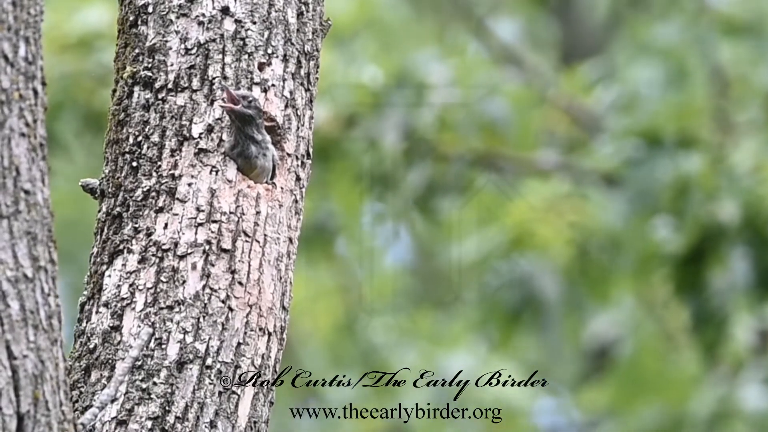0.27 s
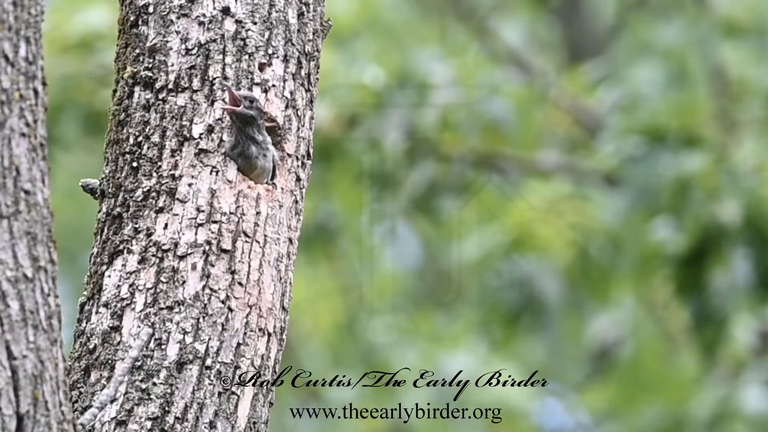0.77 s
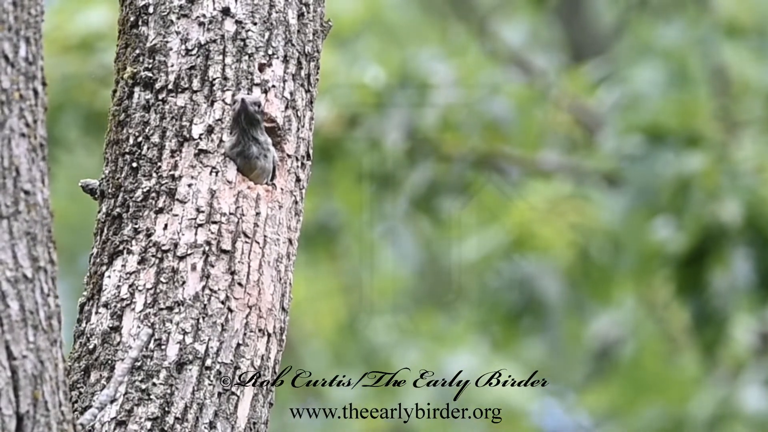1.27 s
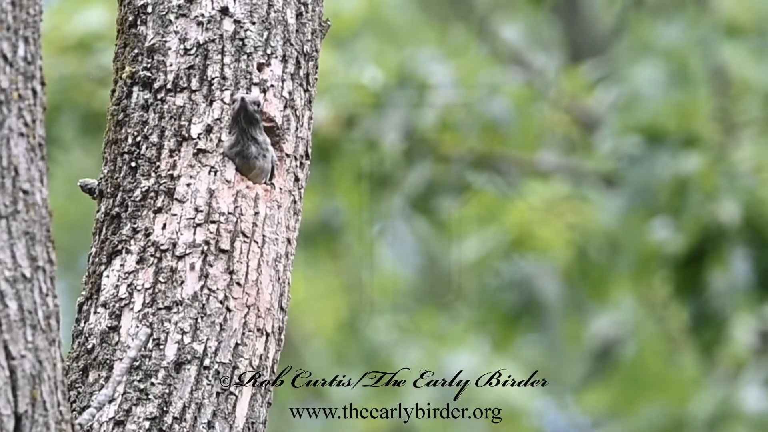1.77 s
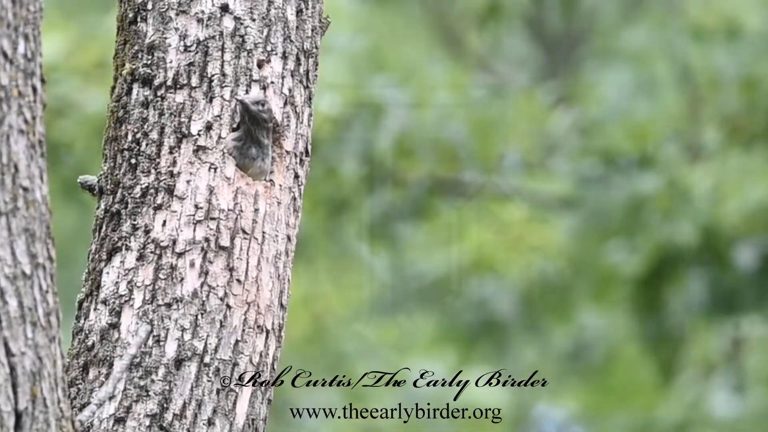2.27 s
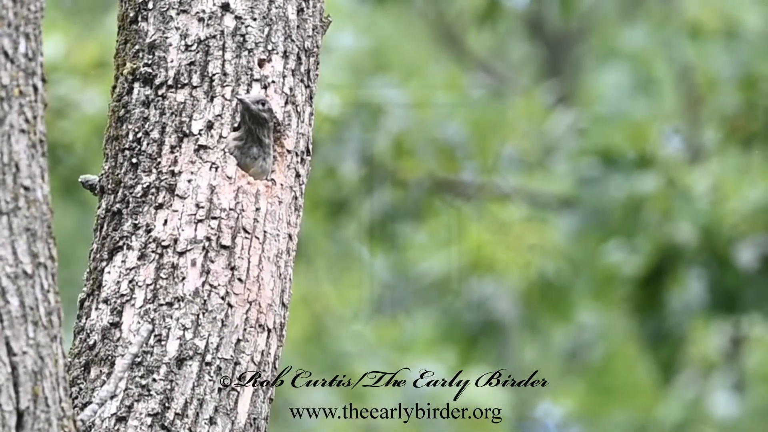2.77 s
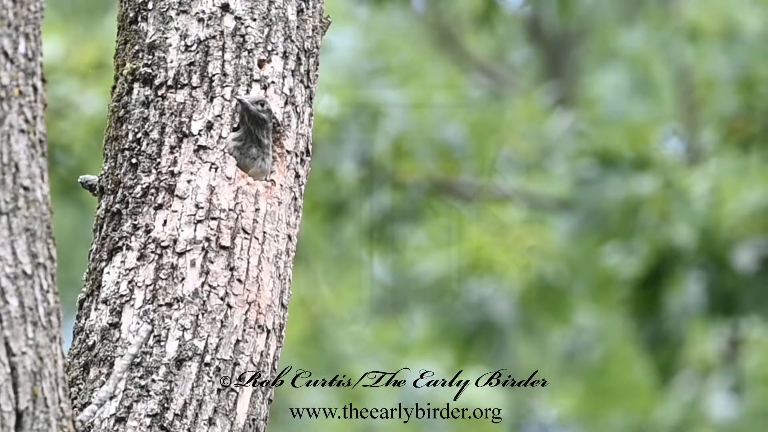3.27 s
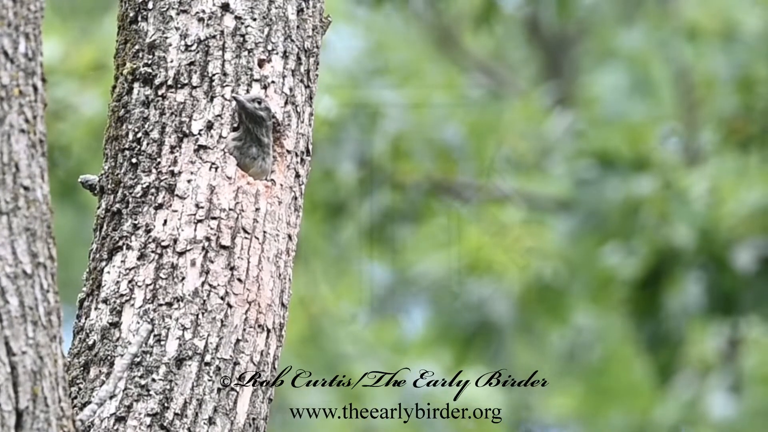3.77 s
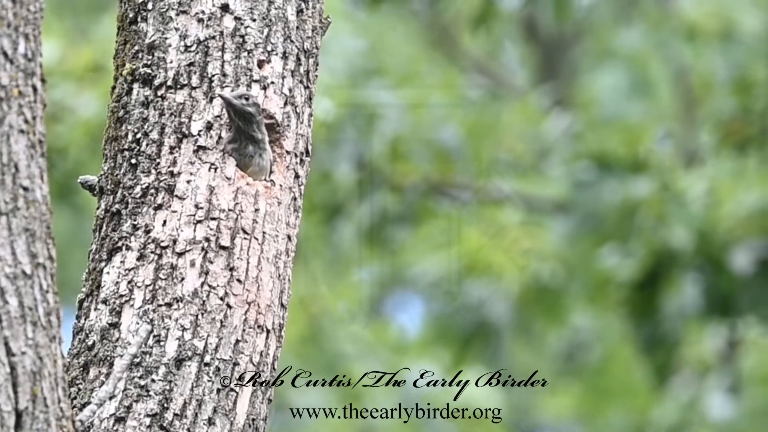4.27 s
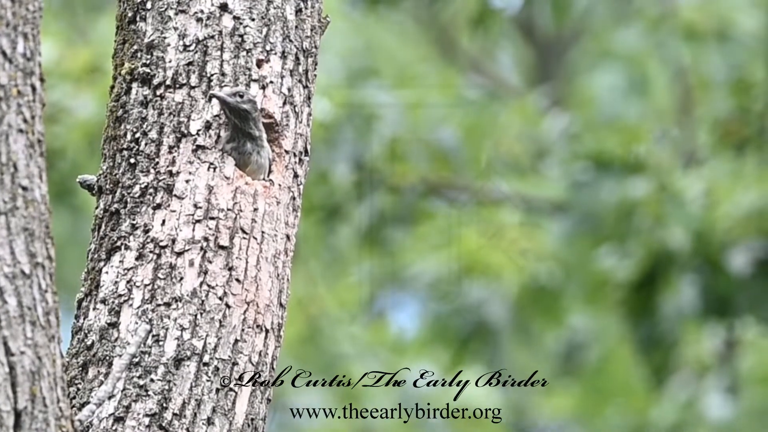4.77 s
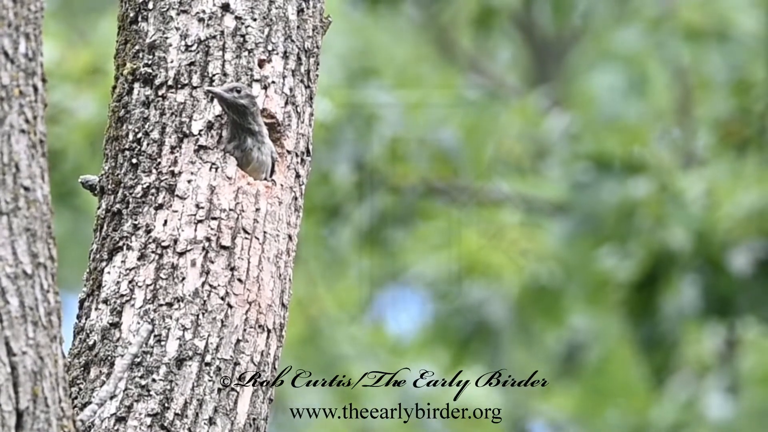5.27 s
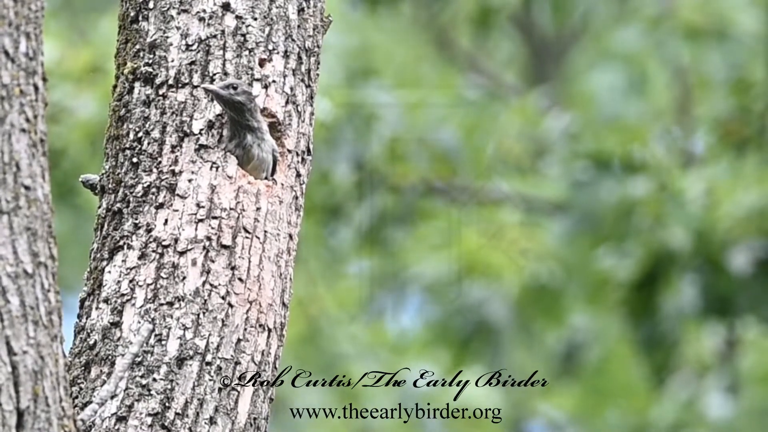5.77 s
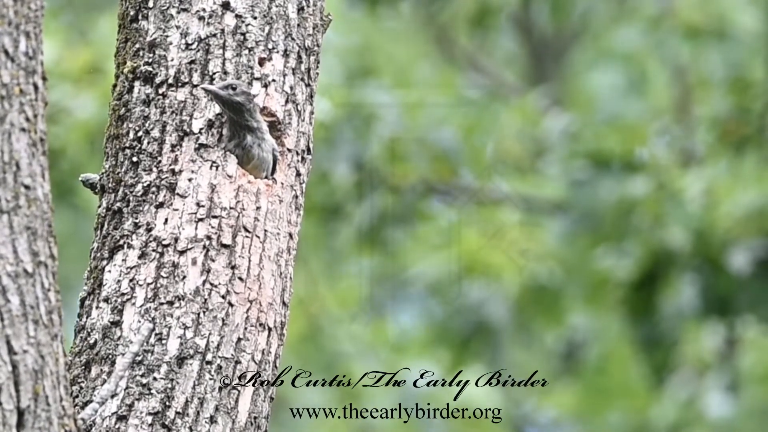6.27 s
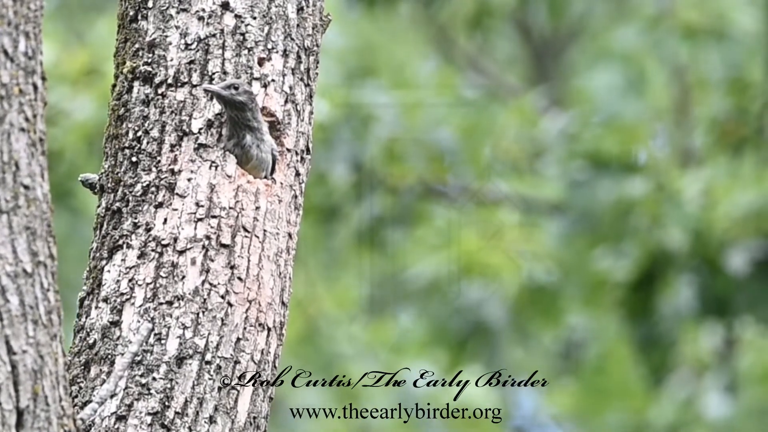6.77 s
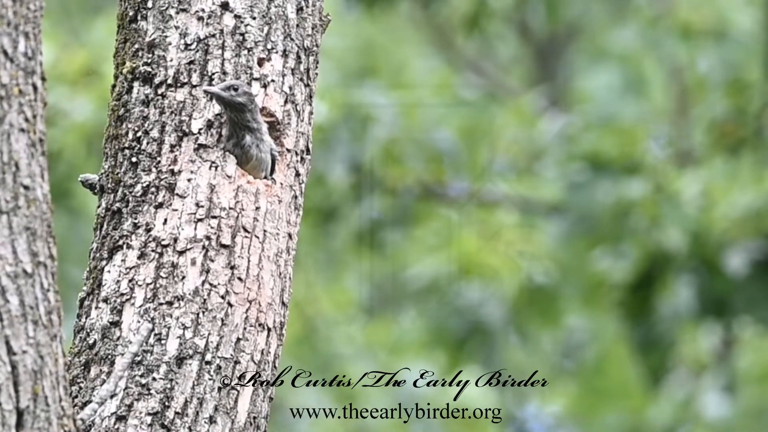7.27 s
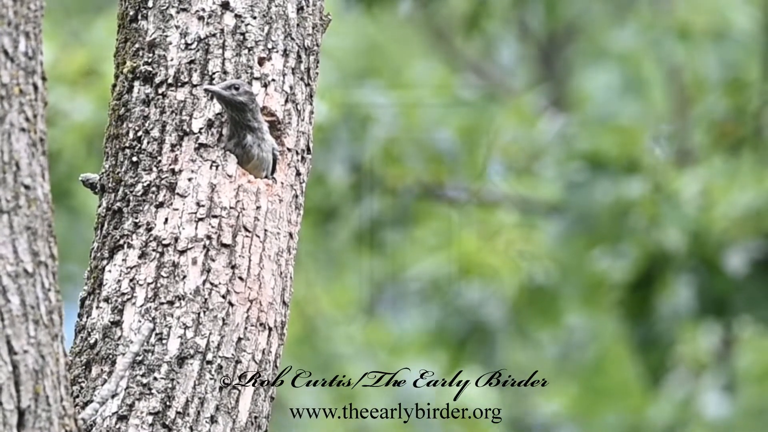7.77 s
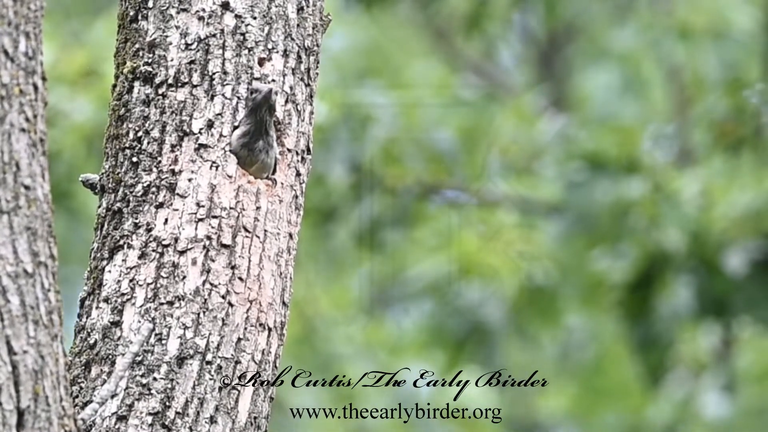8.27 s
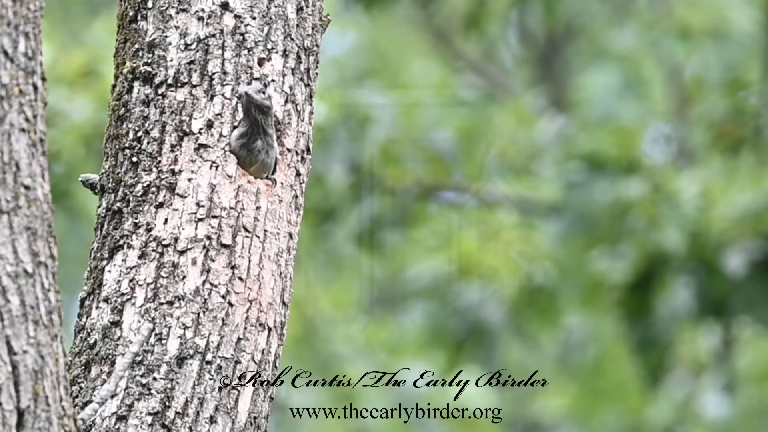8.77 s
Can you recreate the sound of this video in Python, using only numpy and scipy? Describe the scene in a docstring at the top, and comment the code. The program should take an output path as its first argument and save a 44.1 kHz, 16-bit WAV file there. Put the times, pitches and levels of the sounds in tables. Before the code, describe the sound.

One microphone by a woodpecker's nest hole picks up woodland hiss, a distant roar and faint high insects. The nestling gives a few widely spaced rising chips while birds farther off whistle and send short falling chirps through the trees. Late on, the nestling breaks into two fast, raspy rattles, the second louder, followed by one short low whistle from a distant bird.

```python
"""In a wood, one bass-cut microphone by a woodpecker's nest hole. Far-off roar, treble hiss and insects run
throughout; a faint rumble and hum stop at 2.2 s. From 0.5 s distant birds hold whistles, and from 1.1 s
the nestling gives three short rising chips, seconds apart. Falling chirps come through the trees from
2.3 s, one trill at 3.8 s. At 6.8 and 8 s the nestling gives two buzzy rattles; a low whistle comes last.
The two channels differ only in their treble hiss."""
import sys
import numpy as np
from scipy import signal
from scipy.fft import rfft, irfft
from scipy.io import wavfile
from scipy.ndimage import uniform_filter1d

SR = 44100
rng = np.random.default_rng(int(sys.argv[2]) if len(sys.argv) > 2 else 0)


def inscribe(sig):
    """Save sig as 16-bit PCM at rate SR to the path in sys.argv[1].

    A 1-D sig is mono; a 2-D sig holds one channel per row.
    Samples are clipped to [-1, 1] before scaling.
    """
    pcm = np.round(np.clip(np.atleast_2d(sig).T, -1, 1) * 32767)
    wavfile.write(sys.argv[1], SR, pcm.astype(np.int16))


N = 398663
TIME, FREQS = np.arange(N) / SR, np.arange(N // 2 + 1) * SR / N

def undb(db):
    return 10 ** (np.asarray(db) / 20)

def noise(points):
    """Noise of rms 1 coloured by (f/Hz, level/dB) points."""
    hz, db = np.transpose(points)
    colour = undb(np.interp(np.log(FREQS + 1), np.log(hz), db))
    x = irfft(rfft(rng.standard_normal(N)) * colour, N)
    return x / np.std(x)

def walk(rate):
    """Random levels held 1 / rate s and slewed twice; spread near 1."""
    k = int(SR / rate)
    steps = np.repeat(rng.standard_normal(N // k + 1), k)
    return 1.36 * uniform_filter1d(uniform_filter1d(steps, k), k)[:N]

def add(track, s, x):
    i = int(s * SR)
    track[i:i + len(x)] += x

def bump(u, start, end):
    """A half-sine swell between two points of a note."""
    return np.sin(np.pi * np.clip((u - start) / (end - start), 0, 1))

def echo(x, t60_s=0.46):
    """Scatter from trunks and leaves: a decaying noise tail of unit energy."""
    t = np.arange(SR // 2) / SR
    tail = rng.standard_normal(len(t)) * np.exp(-np.log(1000) * t / t60_s) * np.minimum(t / 0.0044, 1)
    return signal.fftconvolve(x, tail / np.sqrt(np.sum(tail ** 2)))[:N]

# Background spectrum of the wood: f/Hz, relative level/dB
WOOD_SPECTRUM = [(120, -90), (200, -63), (567, -23), (848, -7.5), (999, -3.5), (1290, 0.5), (1640, -2),
                 (2110, -6), (2490, -7), (2990, -9), (3730, -5.5), (4160, -11), (5280, -18.5),
                 (12700, -19.5), (15800, -20)]
# Swell of the far-off roar: t/s, level/dB
ROAR_LEVELS = [(0.0, -35.5), (2.97, -37), (4.91, -36.5), (5.29, -37.5), (7.07, -35.5), (7.58, -37.5),
               (7.93, -37), (9.04, -37.5)]

def wood(treble_gain_db=-35):
    """The distant roar swells slowly; the treble hiss above it stays nearly steady."""
    bed = noise(WOOD_SPECTRUM)
    roar = signal.sosfiltfilt(signal.butter(2, 2200, fs=SR, output="sos"), bed)
    roar_db = np.interp(TIME, *np.transpose(ROAR_LEVELS))
    treble = (bed - roar) * undb(treble_gain_db + 0.17 * walk(2.99))
    return roar / np.std(roar) * undb(roar_db) + treble

def rumble_and_hum(hum_hz=284, hum_start_s=1.17, rise_s=.15, stop_s=2.165):
    """A faint rumble grows as a hum sets in; both stop short."""
    gate = np.clip((stop_s - TIME) / 0.009, 0, 1)
    risen = np.clip((TIME - hum_start_s) / rise_s, 0, 1)
    rumble = noise([(100, -44), (160, -36), (330, -8.5), (480, -3.0), (700, 4), (1000, -66)])
    hum = undb(-84.5 + 2.5 * walk(15)) * np.sin(2 * np.pi * hum_hz * TIME)
    return gate * (undb(-72 + 4.5 * risen) * rumble + risen * hum)

def insects(hz=8480, skirt_hz=1400, db=-63):
    """Insects in the wood: a faint, narrow, gently wavering band."""
    band = noise([(hz - skirt_hz, -70), (hz, 0), (hz + skirt_hz, -70)])
    return band * undb(db + .8 * walk(3.2))

# Tone of the electronics: f/Hz, rms level/dB
WHINE_TONES = [(15622, -67)]

def whine():
    """The electronics give a thin high tone of wandering phase."""
    return sum(np.sqrt(2) * undb(db) * np.sin(2 * np.pi * hz * TIME + .8 * walk(8))
               for hz, db in WHINE_TONES)

# Spectrum of the hiss between the channels: f/Hz, relative level/dB
SIDE_SPECTRUM = [(2000, -31), (4400, -55), (8000, -7), (11000, 6.5), (15500, 5.5)]

def side_hiss(db=-57.5):
    """Steady treble hiss, the only stereo width."""
    return undb(db) * noise([(1000, -90)] + SIDE_SPECTRUM)

def whistle(notes, warble_hz, echo_db, slide_share=1, bend=1, swell=0.7):
    """Wavering near-sine slides; bend under 1 slides early, swell under 1 is loudest early."""
    dry, send, flutter, waver = np.zeros(N), np.zeros(N), walk(200), walk(900)
    edge_s, ordinary_db = 0.0013, -32
    for s, length, from_hz, to_hz, db in notes:
        u = np.arange(int(length * SR)) / (length * SR)
        slide = np.minimum(u / slide_share, 1) ** bend
        hz = from_hz + (to_hz - from_hz) * slide + warble_hz * waver[int(s * SR):][:len(u)]
        edges = np.sin(np.pi / 2 * np.clip(np.minimum(u, 1 - u) * length / edge_s, 0, 1)) ** 2
        envelope = undb(db) * edges * np.sin(np.pi * u ** swell) ** .55
        note = envelope * np.sin(2 * np.pi * np.cumsum(hz) / SR)
        leaves_db = 10.5 * np.clip(np.log2(hz / 3970), -.7, 0)  # leaves scatter low pitches more weakly
        distance_db = 0.54 * (ordinary_db - db)  # a fainter bird is further off and has more echo
        add(dry, s, note)
        add(send, s, undb(echo_db + leaves_db + distance_db) * note)
    return dry * undb(1.3 * flutter) + echo(send)

# Held whistles, off in the wood: t/s, length/s, f/Hz, level/dB
HELD_NOTES = [(.500, 0.037, 7475, -50), (1.118, .060, 7350, -51.5), (1.124, .160, 3285, -41.5),
              (4.655, .030, 3200, -45), (4.682, 0.12, 1710, -38), (4.857, .079, 3070, -39),
              (8.604, .031, 1290, -30.5)]

def held_whistles():
    """Distant birds hold one almost steady pitch per note."""
    notes = [(s, length, hz, hz, db) for s, length, hz, db in HELD_NOTES]
    return whistle(notes, warble_hz=14, echo_db=-5)

# Rising chips at the nest hole: t/s, length/s, from f/Hz, to f/Hz, level/dB
CHIP_NOTES = [(1.108, .02, 2400, 2700, -35), (3.466, 0.021, 1950, 2750, -26),
              (6.299, 0.015, 2190, 2740, -26)]

def nestling_chips():
    """The nestling slides quickly up and holds the top, with little echo."""
    return whistle(CHIP_NOTES, warble_hz=170, echo_db=-8, slide_share=.45, bend=.9, swell=.8)

# Falling chirps among the trees: t/s, length/s, from f/Hz, to f/Hz, level/dB
CHIRP_NOTES = [(2.313, 0.04, 4250, 2550, -32), (3.027, 0.035, 4270, 2450, -30.5),
               (3.661, .041, 4100, 2360, -27.5), (3.912, 0.033, 3350, 2800, -37),
               (4.279, .033, 4080, 2370, -29.5), (4.954, .026, 3600, 2900, -36),
               (4.978, 0.032, 4100, 2730, -33), (5.569, .028, 2980, 2780, -43),
               (5.607, 0.021, 4150, 3600, -38), (5.775, .046, 4200, 2890, -38.5),
               (6.002, 0.053, 4210, 3090, -32.5), (6.602, .033, 3830, 2450, -34),
               (7.192, 0.0225, 4200, 3410, -32), (7.511, 0.03, 3700, 2920, -37.5)]

def falling_chirps():
    """Birds further off slide down through the whole note, with plenty of echo."""
    return whistle(CHIRP_NOTES, warble_hz=110, echo_db=-1.5, bend=0.97)

def trill(start_s=3.81, peak_s=3.851, end_s=3.9, rate_hz=110, sweep_hz=950, db=-25.5):
    """A distant bird's run of tiny down-slides swells, fades and sinks in pitch."""
    centre_hz = np.interp(TIME, [start_s, end_s], [3450, 2500])
    swell = np.interp(TIME, [start_s, peak_s, end_s], [0, 1, 0]) ** .8
    cycle = ((TIME - start_s) * rate_hz + 0.91) % 1
    hz = centre_hz + sweep_hz * (.5 - cycle) + 70 * walk(900)
    envelope = undb(db + 1.5 * walk(150)) * swell * np.sin(np.pi * cycle) ** 1.5
    call = envelope * np.sin(2 * np.pi * np.cumsum(hz) / SR)
    return call + undb(-6) * echo(call)

# Slurs that follow a chirp: t/s, length/s, from f/Hz, to f/Hz, level/dB
SLUR_NOTES = [(6.026, 0.0301, 4106, 3200, -34.5), (7.218, .042, 3336, 2575, -32.5)]

def hoarse_slurs():
    """Down-slides off in the trees, made hoarse by a wide, fast warble."""
    return whistle(SLUR_NOTES, warble_hz=344, echo_db=-1, swell=.6)

# Resonances of the nestling's throat: f/Hz, width/Hz, gain/dB
THROAT_BANDS = [(2460, 580, 1), (3290, 860, -1), (3950, 520, -8), (7500, 1400, -22)]

def throat(x):
    """The throat passes the voice through steep-sided resonances."""
    gain = sum(undb(db) / (1 + (2 * (FREQS - hz) / width) ** 4) for hz, width, db in THROAT_BANDS)
    return irfft(rfft(x) * gain, N)

# Notes of two rattles at the nest hole: t/s, final f/Hz, rasp level/dB, clear voice level/dB
RATTLE_NOTES = [(6.764, 1072, -28.5, -33), (6.826, 1126, -31, -27.5), (6.886, 1140, -30.5, -29.5),
                (6.944, 1091, -34, -26), (7.002, 1020, -33, -32), (7.064, 1033, -31, -31),
                (7.122, 990, -30.5, -36), (7.184, 1033, -29.5, -36), (7.249, 996, -32, -31.5),
                (7.312, 1191, -30, -36), (7.397, 1003, -31.5, -41), (7.964, 1110, -31.5, -31),
                (8.027, 1145, -28.5, -30), (8.083, 1264, -26.5, -24), (8.142, 1178, -24, -29),
                (8.201, 1147, -22.5, -29), (8.26, 1032, -26.5, -32), (8.325, 1000, -26, -31),
                (8.406, 990, -31, -40)]

def nestling_rattles(climb=0.239, rough=0.116, ordinary_db=-30):
    """A note opens with a shaky half-pitch rasp, clears into rising harmonics and ends on the second."""
    voiced, second, shake, flutter = np.zeros(N), np.zeros(N), walk(1200), undb(1.2 * walk(600))
    offsets = 2 * np.pi * rng.random((len(RATTLE_NOTES), 19))  # the throat smears each pulse in time
    for (s, hz, rasp_db, clear_db), offset in zip(RATTLE_NOTES, offsets):
        effort_db = rasp_db - ordinary_db
        length = .023 + .0008 * effort_db  # a harder note lasts longer
        upper_db = clear_db - 4 + 0.86 * effort_db  # and lifts its upper harmonics over the second
        u = np.arange(int(length * SR)) / (length * SR)
        jitter = shake[int(s * SR):][:len(u)]
        f0 = hz * (1 - climb * (1 - u) ** 1.44)
        phase = 2 * np.pi * np.cumsum(f0 * (1 + 0.031 * jitter)) / SR
        half_phase = np.pi * np.cumsum(f0 * (1 + rough * jitter)) / SR  # every second pulse is weak
        rasp = sum(np.sin(k * half_phase + offset[k]) for k in range(3, 19)) / 2
        upper = sum(np.sin(k * phase + offset[k]) for k in range(3, 9))
        add(voiced, s, undb(rasp_db) * bump(u, -.01, 0.76) * rasp)
        add(voiced, s, undb(upper_db) * bump(u, 0.14, 0.85) * upper)
        add(second, s, undb(clear_db) * bump(u, 0.38, 1) * np.sin(2 * phase))
    call = throat(voiced * flutter) + second * flutter
    return call + undb(-6.5) * echo(call)

def brighten(x, hz=3750, width_hz=700, db=3):
    """The whistled calls ring a little brighter around 3750 Hz."""
    return irfft(rfft(x) * undb(db / (1 + (2 * (FREQS - hz) / width_hz) ** 2)), N)

def scene():
    """Birds and background sit in the centre; side hiss is added left and subtracted right."""
    rattles = nestling_rattles()
    calls = held_whistles() + nestling_chips() + falling_chirps() + trill() + hoarse_slurs()
    mid = wood() + rumble_and_hum() + insects() + whine() + brighten(calls) + rattles
    side = side_hiss()
    return np.array([mid + side, mid - side])

def record(dry, bass_cut_hz=130, top_hz=15760):
    """The recorder cuts the bass and, steeply, the top."""
    thin = signal.sosfilt(signal.butter(6, bass_cut_hz, "high", fs=SR, output="sos"), dry)
    return signal.sosfilt(signal.ellip(12, .2, 80, top_hz, fs=SR, output="sos"), thin)

dry = scene()
out = record(dry)
inscribe(out)
```